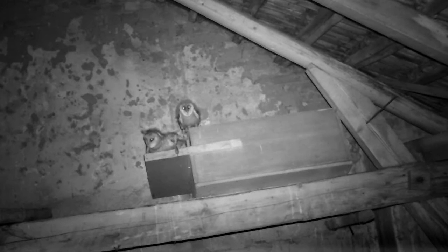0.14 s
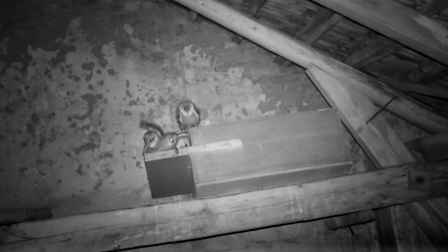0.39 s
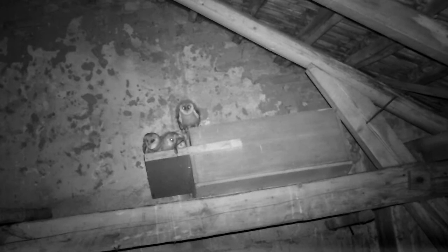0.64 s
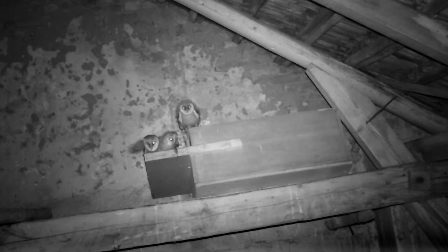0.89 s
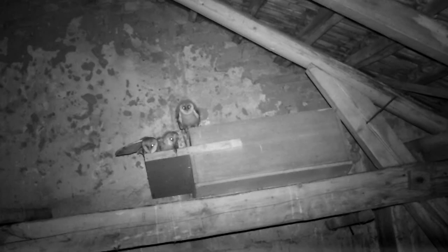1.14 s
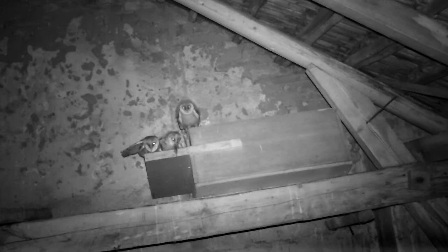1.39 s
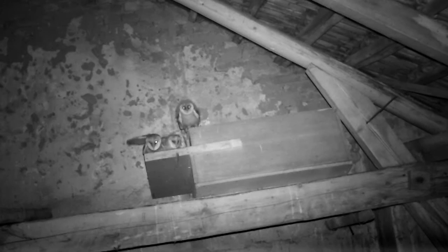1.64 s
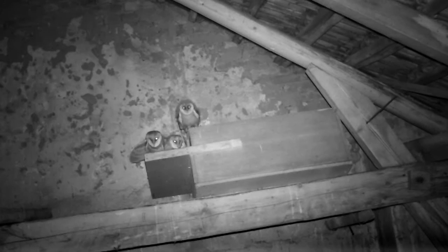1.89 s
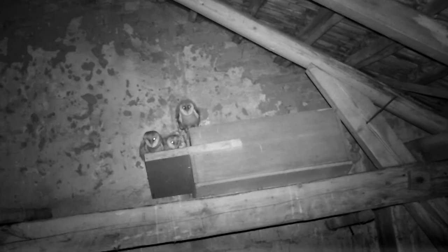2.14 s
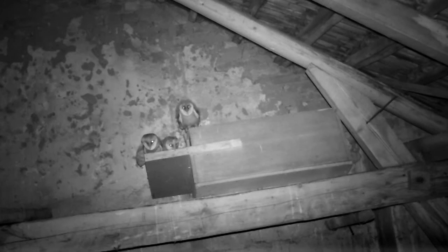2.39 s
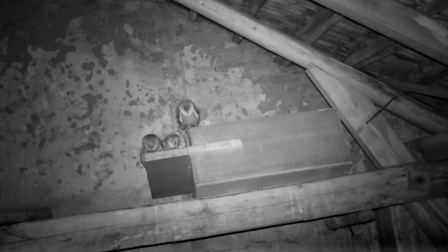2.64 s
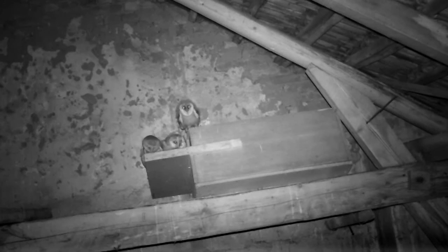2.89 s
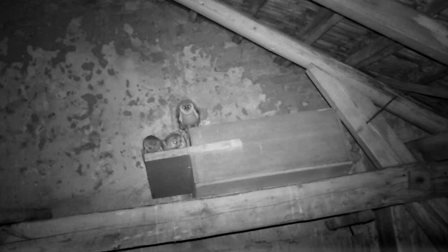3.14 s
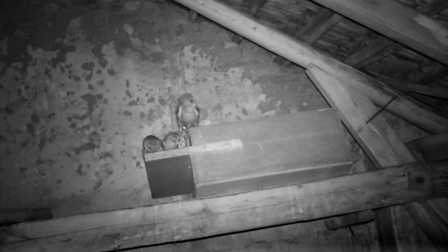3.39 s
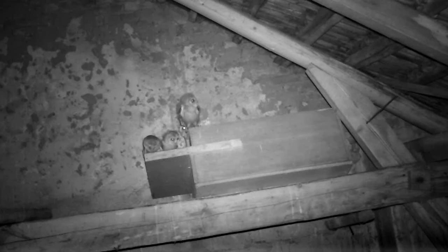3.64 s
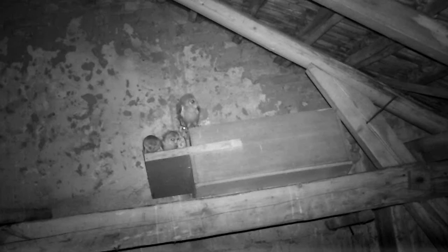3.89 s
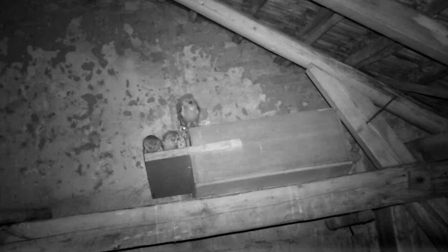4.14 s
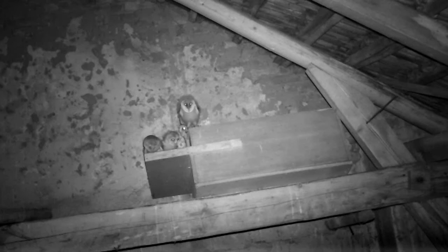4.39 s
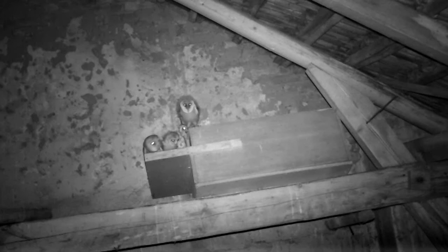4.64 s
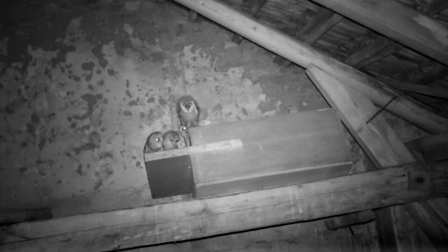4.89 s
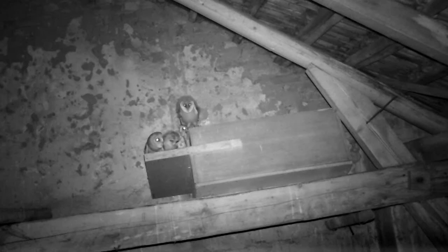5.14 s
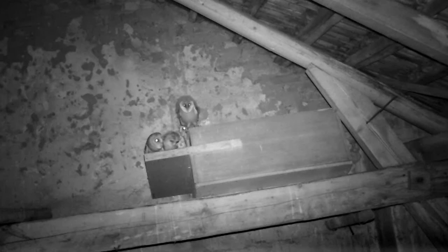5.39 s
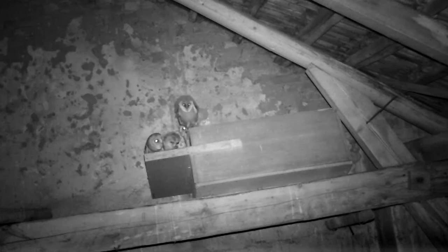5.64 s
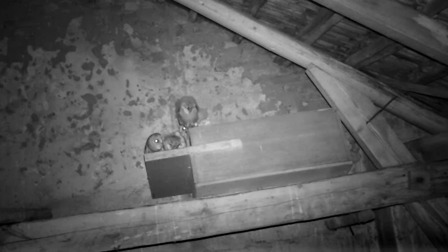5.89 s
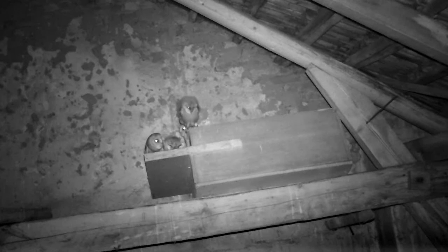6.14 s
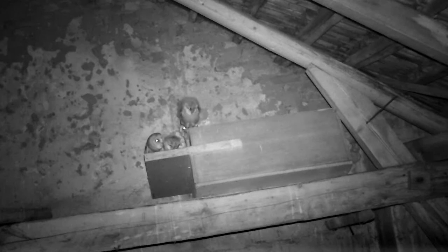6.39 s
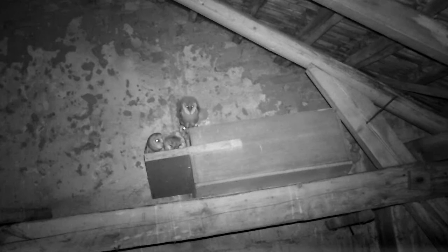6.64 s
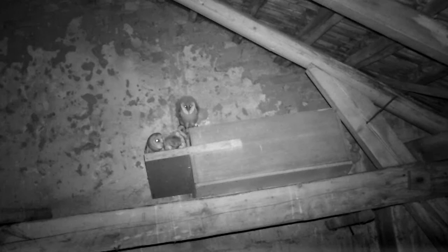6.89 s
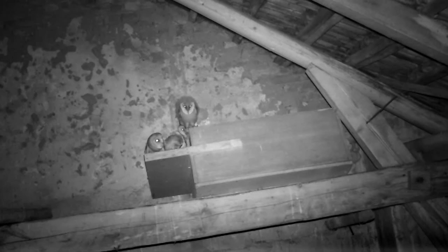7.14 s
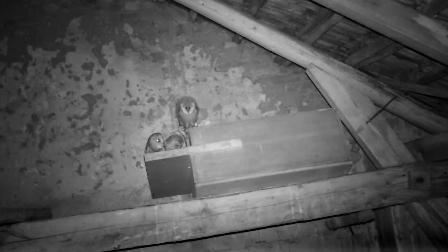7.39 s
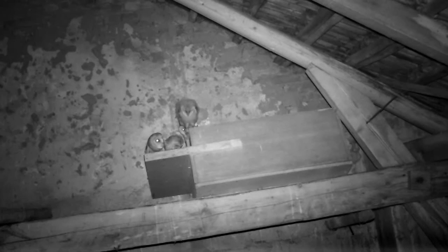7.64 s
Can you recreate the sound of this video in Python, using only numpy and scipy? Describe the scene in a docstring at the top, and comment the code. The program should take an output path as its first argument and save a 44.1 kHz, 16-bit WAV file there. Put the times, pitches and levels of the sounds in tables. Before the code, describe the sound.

Young owls in a nest box trade long rasping begging hisses in a roof space at night, with soft wooden thumps and steady electrical ticking.

```python
"""A loud young owl is in mid-hiss as it starts; a dull and a thin one answer from the nest box under a roof at night.
All are filtered noise with a fast tail. Faint tonal peeps fall among them; the boards, decaying sine modes, give
a faint scuff at 0.55 s, then feet and wings thump them from 1.9 s. Two faint crickets chirp outside as bent sines
until 6.7 s; the loud owlet's last hiss comes with its head turned. Throughout, air and traffic rumble under a
smooth hiss, and a switching load in the camera ticks in its audio."""
import sys
import numpy as np
from scipy import signal
from scipy.fft import rfft, irfft, next_fast_len
from scipy.io import wavfile
from scipy.ndimage import map_coordinates

SR = 44100
rng = np.random.default_rng(int(sys.argv[2]) if len(sys.argv) > 2 else 0)


def to_linear_factor(level_db):
    """Convert decibel levels (scalar or array-like) to linear amplitude factors."""
    exponent = np.asarray(level_db, float) / 20
    return 10 ** exponent


def wav_record(signal):
    """Record a signal, one row per channel, as 16-bit PCM in the file named by sys.argv[1]."""
    frames = np.transpose(np.atleast_2d(signal))
    bounded = np.clip(frames, -1, 1)
    # unit amplitude maps onto the largest positive 16-bit level
    quanta = np.round(bounded * 32767).astype(np.int16)
    wavfile.write(sys.argv[1], SR, quanta)


N = 344862


def unit(x):
    """Scaled to rms 1."""
    return x / np.sqrt(np.mean(x ** 2) + 1e-20)


def along(points, hz):
    """Interpolates (Hz, value) points on a log frequency axis."""
    f, v = np.transpose(points)
    return np.interp(np.log(hz + 1), np.log(f + 1), v)


def filtered(x, response):
    """x times a complex response of frequency."""
    m = next_fast_len(N + SR // 2)
    return irfft(rfft(x, m) * response(np.fft.rfftfreq(m, 1 / SR)), m)[:N]


def wobble(rate_hz):
    """A smooth random curve, rate_hz knots a second."""
    knots = rng.standard_normal(int(N * rate_hz / SR) + 4)
    return map_coordinates(knots, [np.arange(N) * rate_hz / SR])


def owlet(name, throat, swell_db, release_db_per_s, beak_hz, glide_s, beak_width_hz, beak_db, closing_db,
          early_db, tilt_db_per_octave, tilt_per_db, chest_hz, chest_db, rasp_db, wet_db):
    """Turbulent breath roughened by chaotic membranes; effort brightens it, one resonance slides with the beak."""
    # Begging hisses. Each row: owlet, start in seconds, stop in seconds, peak level in dB,
    # swell time constant in seconds, beak resonance at the start in Hz.
    hisses = [("loud", -0.094, 0.74, -21.5, 0.29, 2790), ("dull", 0.94, 1.507, -35, .15, 7100),
              ("thin", 1.598, 2.42, -39, 0.23, 2700), ("loud", 2.405, 3.326, -22.5, .24, 2500),
              ("thin", 3.607, 4.42, -34.5, 0.4, 2700), ("loud", 4.314, 5.166, -21.5, 0.28, 2290),
              ("dull", 5.665, 6.39, -36.5, .15, 7100), ("turned", 6.674, 7.559, -23.5, 0.25, 4600)]
    # Low resonance of every call, drawn for a 1560 Hz centre. Each row: frequency in Hz, relative density in dB.
    chest_curve = [(800, -120)] + [(1000, -33), (1250, -16.5), (1420, -8.5), (1505, -8.5), (1555, 0),
                                   (1590, -2.5), (1635, -27.5), (1800, -48.5)] + [(2200, -120)]
    onset_db, onset_s = 13, 0.044  # fast break-in ahead of the swell
    closing_s = 0.036
    chest_follows, chest_holds_db, chest_drops = 0.31, 20, 1.5  # share of the swell; hold, then faster fall
    airy_end = 0.2  # tilt gained per dB of fall

    breath = rng.standard_normal(N) * to_linear_factor(rasp_db * wobble(260))
    hz, t, spectrum = signal.stft(unit(breath), SR, nperseg=1024)
    f = hz[:, None]

    def mode(centre_hz, width_hz, db):
        """Power response of a steep-skirted resonance."""
        return to_linear_factor(2 * db) / (1 + (2 * (f - centre_hz) / width_hz) ** 2) ** 2

    def norm(g):
        """Rms 1 over frequency."""
        return g / np.sqrt(np.mean(g ** 2, axis=0))

    chest = norm(to_linear_factor(along(chest_curve, f * 1560 / chest_hz)))
    steady = sum(mode(*row) for row in throat)
    octaves = np.log2(np.clip(f, 2500, 7000) / 2850)
    gain = np.zeros(spectrum.shape)
    for start, stop, peak_db, swell_s, first_hz in [row[1:] for row in hisses if row[0] == name]:
        age, left = np.maximum(t - start, 0), np.maximum(stop - t, 0)
        early = np.exp(-age / swell_s)
        rising_db = swell_db * early + onset_db * np.exp(-age / onset_s)
        falling_db = release_db_per_s * np.maximum(t - stop, 0)
        effort_db = peak_db - rising_db - falling_db
        chest_fall_db = chest_drops * np.maximum(falling_db - chest_holds_db, 0)
        low_db = chest_db - chest_follows * rising_db - chest_fall_db

        sliding_hz = beak_hz + (first_hz - beak_hz) * np.exp(-age / glide_s)
        sliding_db = beak_db + early_db * early - closing_db * np.exp(-left / closing_s)
        beak = mode(sliding_hz, beak_width_hz, sliding_db)
        tilt = tilt_db_per_octave - tilt_per_db * rising_db + airy_end * np.minimum(falling_db, 35)
        shape = np.sqrt(steady + beak) * to_linear_factor(tilt * octaves)
        gain += (t >= start) * (to_linear_factor(effort_db) * norm(shape) + to_linear_factor(low_db) * chest)
    voice = signal.istft(spectrum * gain, SR, nperseg=1024)[1][:N]
    return roof(voice, wet_db) / np.sqrt(1 + to_linear_factor(2 * wet_db))


def roof(x, wet_db):
    """Direct sound, a quick tail from the near rafters and a weaker, slower one from the far end."""
    # Decay among the near rafters. Each row: frequency in Hz, t60 in seconds.
    rafters = [(1500, 0.39), (3000, 0.39), (5000, 0.39), (8000, 0.17)]
    hz, t, spectrum = signal.stft(rng.standard_normal(SR), SR, nperseg=256)
    fall_db = 60 * t / along(rafters, hz)[:, None]
    decay = to_linear_factor(-fall_db) + to_linear_factor(-11 - fall_db / 2.37)
    tail = signal.istft(spectrum * decay, SR, nperseg=256)[1]
    late = signal.fftconvolve(np.pad(x, (200, 0)), tail / np.linalg.norm(tail))[:N]
    return x + to_linear_factor(wet_db) * late


def thumps():
    """A soft foot or wing sets the board modes going; the higher the mode, the more it blurs into a scuff."""
    # Board modes. Each row: frequency in Hz, t60 in seconds.
    boards = [(60, 0.46), (88, 0.55), (112, .6), (142, 0.5), (205, .3), (700, .3), (894, 0.26)]
    # Feet and wings on the boards. Each row: start in seconds, level in dB, pitch of the spot in Hz.
    blows = [(.55, -42.5, 894), (1.904, -36.5, 191), (1.915, -20, 94.2), (1.965, -20.5, 64),
             (1.995, -26, 85), (2.15, -29, 59.4), (2.22, -34.5, 112), (2.57, -36, 58.8),
             (2.925, -43.5, 700), (2.945, -32.5, 142), (2.985, -29.5, 142), (3.02, -33.5, 112),
             (3.09, -34, 61.4), (3.35, -45.5, 61), (3.72, -39.5, 65.8)]
    spot_db_per_octave = 36  # loss of modes away from the spot's pitch
    attack_s = 0.0066
    out, t = np.zeros(N + SR), np.arange(SR) / SR
    for start, db, spot_hz in blows:
        wander = np.cumsum(rng.standard_normal(SR)) / np.sqrt(SR) / 25
        ring = np.zeros(SR)
        for hz, t60 in boards:
            mode_db = -spot_db_per_octave * abs(np.log2(hz / spot_hz)) - 60 * t / t60
            ring += to_linear_factor(mode_db) * np.sin(hz * (2 * np.pi * t + wander))
        out[round(start * SR):][:SR] += to_linear_factor(db) * (1 - np.exp(-t / attack_s)) * ring
    return out[:N]


def notes(rows, waver_hz, edge_s, bend_hz):
    """Nearly pure tones that waver in pitch and level and bend with a 25 ms time constant at the end."""
    t = np.arange(N) / SR
    out = np.zeros(N)
    drift = np.cumsum(waver_hz * wobble(40)) / SR
    flutter = to_linear_factor(1.1 * wobble(60))
    for start, length, hz, db in rows:
        left = start + length - t
        gate = np.clip(np.minimum(t - start, left) / edge_s, 0, 1)
        bend = bend_hz * .025 * np.exp(-np.maximum(left, 0) / .025)  # in cycles
        out += to_linear_factor(db) * np.sqrt(2) * gate * np.sin(2 * np.pi * (hz * t + drift + bend))
    return out * flutter


def peeps():
    """Short tonal peeps with soft edges and no bend."""
    # Peeps. Each row: start in seconds, length in seconds, frequency in Hz, level in dB.
    peep_rows = [(.545, .025, 1170, -50), (.79, .03, 1550, -47), (1.425, .03, 1470, -49),
                 (3.385, .03, 1540, -48), (5.225, .035, 1540, -49)]
    return notes(peep_rows, waver_hz=30, edge_s=.012, bend_hz=0)


def crickets():
    """Wing tones from outside, with sharp breaks; each bends up at its end."""
    # Chirps. Each row: start in seconds, length in seconds, frequency in Hz, level in dB.
    chirps = [(.83, .12, 2320, -54), (1.62, .2, 2500, -54), (1.85, .28, 2500, -54), (2.2, .2, 2500, -54),
              (3.44, .22, 2310, -55), (3.7, .09, 2300, -51), (5.25, .16, 2310, -54),
              (5.418, .112, 2310, -53), (5.542, .114, 2300, -52), (5.545, .085, 2505, -56),
              (5.668, .08, 2310, -54), (6.452, .07, 2340, -51), (6.548, .094, 2330, -51),
              (6.65, .05, 2230, -54)]
    return notes(chirps, waver_hz=10, edge_s=.006, bend_hz=55)


def night():
    """Low rumble of air and traffic over a smooth hiss: shaped noise whose level drifts slightly."""
    # Rumble and hiss spectrum. Each row: frequency in Hz, relative density in dB.
    spectrum = [(15, -7), (30, 1), (70, -8.5), (115, -7.5), (170, -21), (400, -22.5), (800, -24),
                (1600, -28.5), (3000, -29), (5800, -33.5), (7000, -42.5), (8000, -50.5)]
    noise = filtered(rng.standard_normal(N), lambda hz: to_linear_factor(along(spectrum, hz)))
    return to_linear_factor(-45.5 + 0.34 * wobble(3)) * unit(noise)


def ticks():
    """A load switches on and off; the coupling capacitors turn each voltage step into a tick that sags back."""
    period_s, on_s, off_s = .12554, .0195, .1047
    small_tick_s = .4207
    step_db, first_hz, second_hz, edge_hz = -30.0, 32, 3.8, 5900
    t = np.arange(N) / SR
    load = to_linear_factor(step_db) * ((t - on_s) % period_s < off_s - on_s)
    every_eighth = (t - small_tick_s) / (8 * period_s) % 1
    load += to_linear_factor(step_db - 5.0) * every_eighth  # a smaller drop that creeps back

    def response(hz):
        """Two high-pass corners, and three low-pass poles that round the step's edge."""
        coupling = (1j * hz) ** 2 / ((1j * hz + first_hz) * (1j * hz + second_hz))
        return coupling / (1 + 1j * hz / edge_hz) ** 3

    return filtered(load - load[0], response)


def converter(x):
    """A slow converter mirrors the band above half its rate; its filter notches both sides of the fold."""
    # Converter filter. Each row: frequency in Hz, gain in dB.
    edge = [(6800, -1), (7390, -8.5), (7490, -30.5), (7600, -7.5), (7900, 2), (8100, -1.5), (8330, -14),
            (8520, -35.5), (8750, -29.5), (9100, -46.5), (9200, -90)]
    rate_hz = 16000
    m = 441 * 800  # FFT length that puts the fold on a bin
    half = rate_hz * m // (2 * SR)
    low = rfft(x, m)[:half + 1]
    mirror = np.conj(low[-2::-1])
    both = np.pad(np.concatenate([low, mirror]), (0, m // 2 - 2 * half))
    return irfft(both * to_linear_factor(along(edge, np.fft.rfftfreq(m, 1 / SR))), m)[:N]


def scene():
    """Owlets in the roof, with the night around them; with its head turned the loud one slides a brighter resonance."""
    # Fixed throat and beak resonances of each owlet.
    # Each row: frequency in Hz, width in Hz, relative level in dB.
    loud_throat = [(2225, 230, -19), (2586, 240, -4.5), (3164, 303, -4), (3584, 230, -8.5), (3813, 233, -7),
                   (4220, 670, -16), (4697, 510, -16), (5220, 330, -21.5), (5560, 410, -24),
                   (6030, 640, -27), (6500, 580, -33.5), (7110, 730, -30), (7994, 320, -35.5)]
    dull_throat = [(2944, 620, 0), (2156, 250, -5), (2345, 260, -4.5), (3240, 730, -7), (3820, 330, -6.5),
                   (4360, 510, -20), (5000, 1400, -24.5), (6600, 390, -24), (7020, 700, -23),
                   (7940, 800, -28.5)]  # same columns
    thin_throat = [(2114, 170, -5.5), (2330, 350, -5), (3230, 510, -4), (3860, 590, -9.5),
                   (4700, 2200, -14.5), (5740, 470, -13), (6300, 390, -11.5), (6730, 240, -17.5),
                   (7030, 500, -21.5), (8100, 600, -27.5)]  # same columns
    owls = owlet("loud", loud_throat, swell_db=11, release_db_per_s=309, beak_hz=2880, glide_s=0.2,
                 beak_width_hz=238, beak_db=2.0, closing_db=2, early_db=-2.2, tilt_db_per_octave=2.0,
                 tilt_per_db=0.32, chest_hz=1558, chest_db=-50, rasp_db=0.7, wet_db=-2.0)
    owls += owlet("turned", loud_throat + [(2850, 400, 0.0086)], swell_db=17, release_db_per_s=148.5,
                  beak_hz=4990, glide_s=.12, beak_width_hz=1120, beak_db=-16.5, closing_db=-1.0, early_db=8,
                  tilt_db_per_octave=2.5, tilt_per_db=0.6, chest_hz=1548, chest_db=-51, rasp_db=0.3, wet_db=-2.2)
    owls += owlet("dull", dull_throat, swell_db=9, release_db_per_s=378, beak_hz=6060, glide_s=0.19,
                  beak_width_hz=200, beak_db=-16, closing_db=0, early_db=-25, tilt_db_per_octave=2.3,
                  tilt_per_db=1.3, chest_hz=1505, chest_db=-55.5, rasp_db=1.3, wet_db=1.1)
    owls += owlet("thin", thin_throat, swell_db=11, release_db_per_s=298, beak_hz=2930, glide_s=.25,
                  beak_width_hz=500, beak_db=0.6, closing_db=-0.3, early_db=-2.7, tilt_db_per_octave=0.7,
                  tilt_per_db=0.5, chest_hz=1539, chest_db=-53, rasp_db=0.0, wet_db=2.2)
    return (owls + thumps() + peeps() + crickets() + night())[None]


def roll_off(x):
    """The treble ends steeply here."""
    return signal.sosfilt(signal.butter(12, 9040, fs=SR, output="sos"), x)


def record(dry):
    """The camera's audio circuit adds its ticks ahead of the converter."""
    heard = converter(dry[0] + ticks())
    return roll_off(heard[None])


dry = scene()
out = record(dry)
wav_record(out)
```